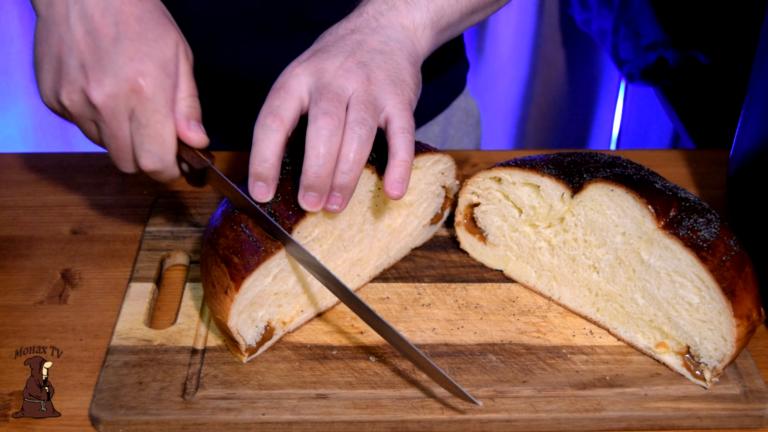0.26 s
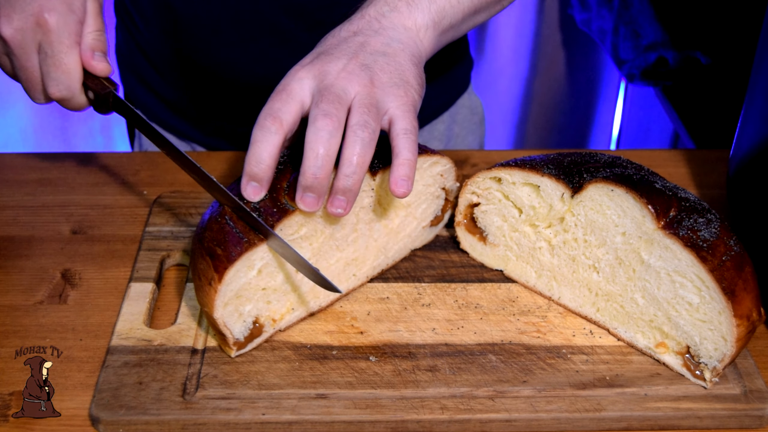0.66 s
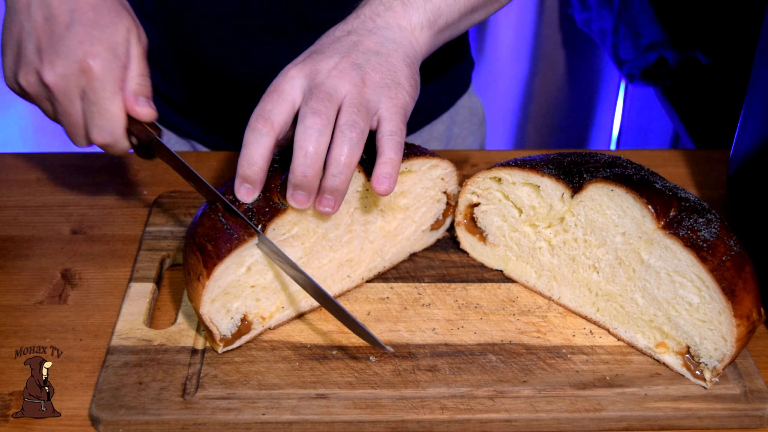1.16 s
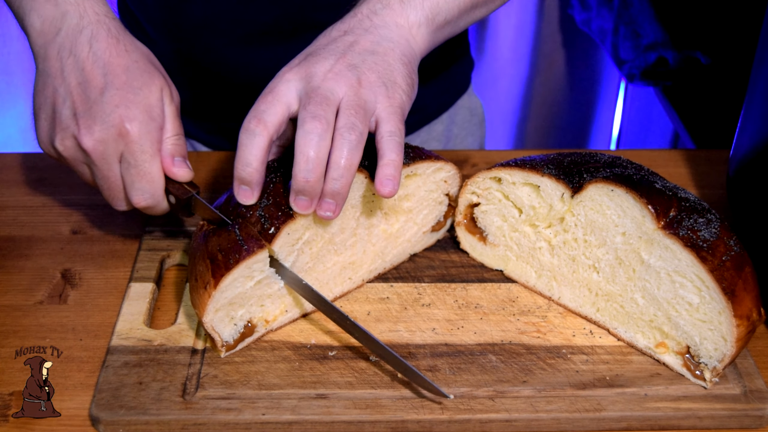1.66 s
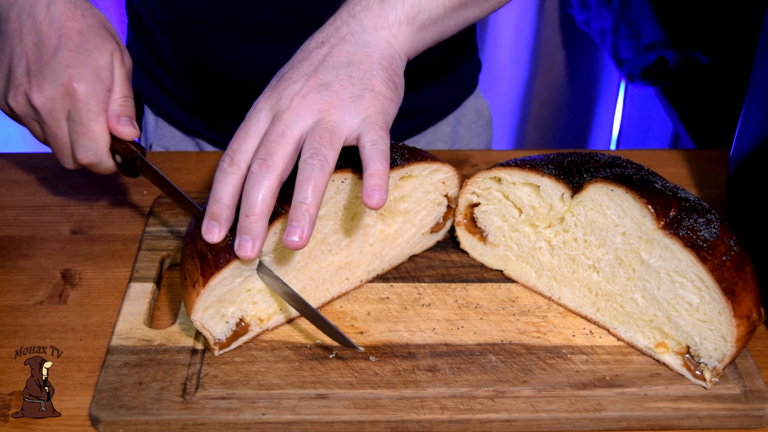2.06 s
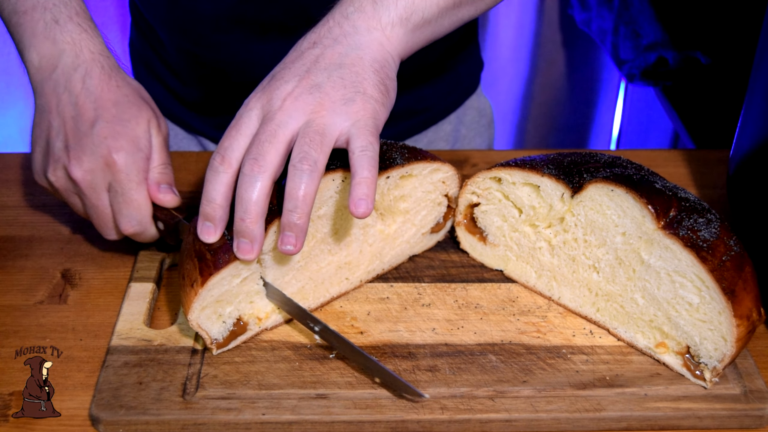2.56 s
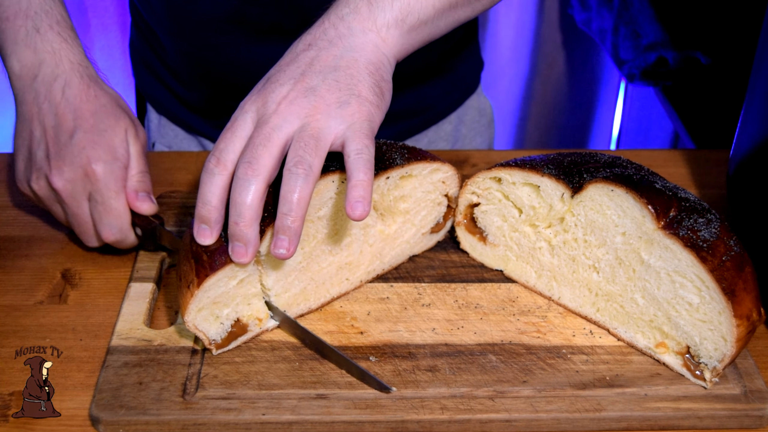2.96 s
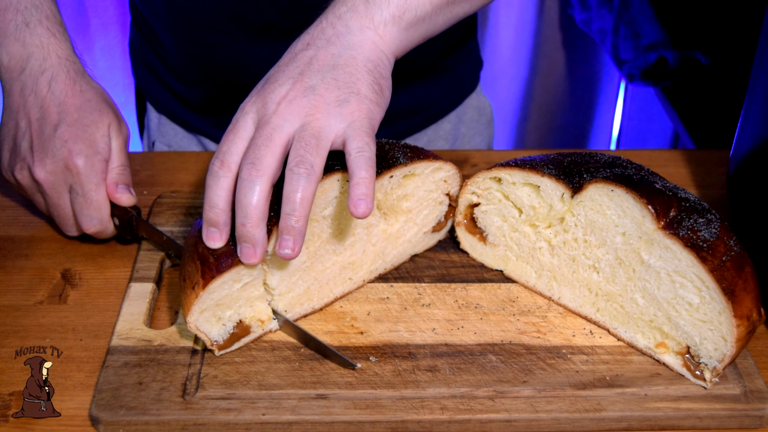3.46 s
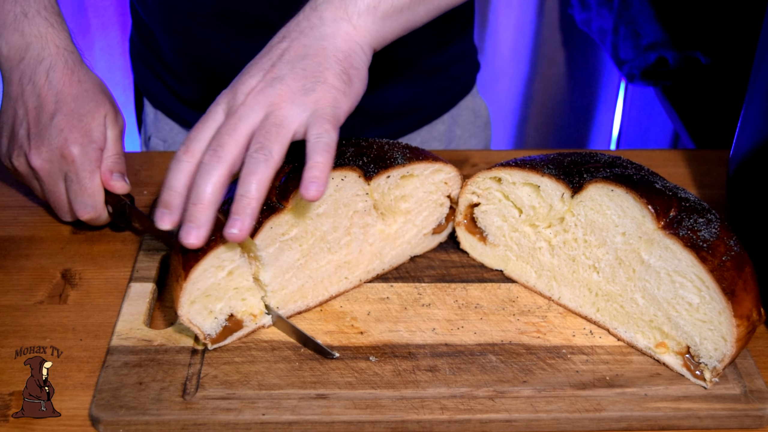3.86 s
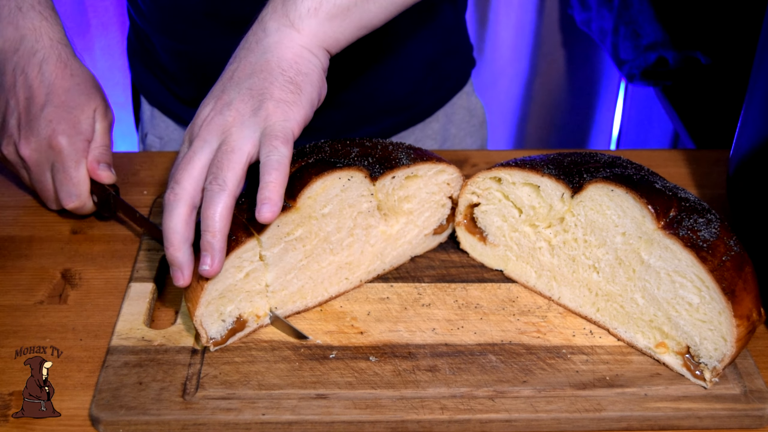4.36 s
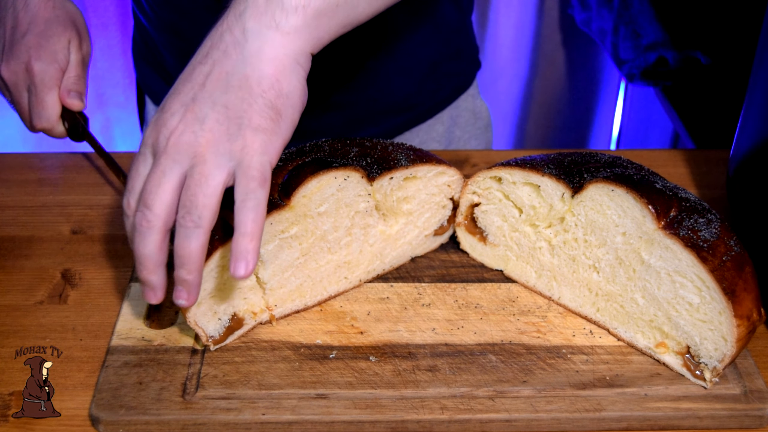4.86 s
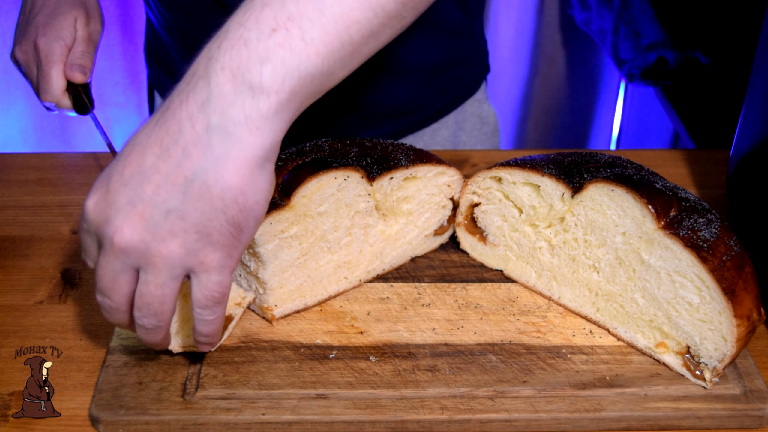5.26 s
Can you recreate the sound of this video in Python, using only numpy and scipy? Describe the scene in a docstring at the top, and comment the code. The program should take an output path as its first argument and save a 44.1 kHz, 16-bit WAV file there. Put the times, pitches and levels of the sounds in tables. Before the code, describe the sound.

Close, rasping knife strokes cut through bread, the crust crackling before the blade drags out across a wooden board.

```python
"""A long knife saws through a soft loaf on a wooden board, close by in a quiet kitchen.
Tearing crumb hisses along the blade, and the crust gives way in small jerks that ring loaf and board.
The blade is then drawn out over the wood and a hand lifts the slice. Each friction is a stream of tiny
stick-slip kicks ringing a body. Distant rumble, a low hum and microphone hiss lie underneath."""
import sys
import numpy as np
from scipy import signal
from scipy.fft import rfft, irfft, next_fast_len
from scipy.io import wavfile
from scipy.ndimage import uniform_filter1d, map_coordinates

SR = 44100
rng = np.random.default_rng(int(sys.argv[2]) if len(sys.argv) > 2 else 0)


def unload_audio(sound):
    """Save the sound as a 16-bit wav file, at the path given as the first command line argument."""
    columns = np.transpose(np.atleast_2d(sound))
    # keep every value between -1 and 1, then stretch to whole-number steps
    steps = np.round(np.clip(columns, -1, 1) * 32767)
    wavfile.write(sys.argv[1], SR, steps.astype(np.int16))


N = 243431


def amp(db):
    """Gain of a level in dB."""
    return 10 ** (np.asarray(db) / 20)


def unit(x):
    """x at rms 1."""
    return x / np.sqrt(np.mean(x ** 2) + 1e-20)


def fader(level_db, sound):
    """A sound brought to rms 1, then ridden by a level curve."""
    return amp(level_db) * unit(sound)


def along(points, hz):
    """Read (freq_hz, value) points at hz, on a log frequency axis."""
    freqs, values = np.transpose(points)
    return np.interp(np.log(hz + 1), np.log(freqs + 1), values)


def curves(rows):
    """Automation: one value per sample for each column after the time."""
    times, *columns = np.transpose(rows)
    return [np.interp(np.arange(N) / SR, times, column) for column in columns]


def wobble(rate_hz):
    """A smooth random curve with rate_hz knots a second."""
    knots = rng.standard_normal(int(N * rate_hz / SR) + 4)
    return map_coordinates(knots, [np.arange(N) * rate_hz / SR])


def filtered(x, response):
    """x through a complex frequency response."""
    size = next_fast_len(N + SR // 2)
    return irfft(rfft(x, size) * response(np.fft.rfftfreq(size, 1 / SR)), size)[..., :N]


def ring(x, modes):
    """x rings a body: one band-pass resonance per mode, alternating in polarity."""
    return filtered(x, lambda hz: sum(
        (-1) ** k * amp(db) * 1j * hz * width / (pitch ** 2 - hz ** 2 + 1j * hz * width)
        for k, (pitch, width, db) in enumerate(modes)))


def slips(per_s, spread_db, clump_db):
    """Tiny stick-slip kicks at random moments: many small, few large, clumped by a wavering level."""
    happens = rng.random(N) < per_s / SR
    size_db = spread_db * np.minimum(rng.exponential(size=N), 3.5) + clump_db * wobble(45)
    return happens * rng.choice([-1, 1], N) * amp(size_db)


def patchy(x, depth_db):
    """The contact shifts along the blade, so the colour drifts in patches."""
    spectrum = signal.stft(x, nperseg=512)[2]
    patches = uniform_filter1d(rng.standard_normal(spectrum.shape), size=5, axis=0)  # across frequency
    patches = uniform_filter1d(patches, size=10, axis=1)  # across time
    return signal.istft(spectrum * amp(depth_db * unit(patches)), nperseg=512)[1][:N]


# Tone of the rumble: freq_hz, gain_db
RUMBLE_EQ = [(15, -47), (25, -17), (64, -5.5), (130, -10), (205, -12.5), (400, -16.5), (1000, -21.5),
             (3000, -29), (8000, -31), (16000, -44)]


def distant_rumble():
    """A bed of far rumble through the walls, its level wavering slightly."""
    rumble = filtered(rng.standard_normal(N), lambda hz: amp(along(RUMBLE_EQ, hz)))
    return amp(-53.5 + 0.52 * wobble(3.12)) * unit(rumble)


# Path of the hum: time_s, pitch_hz, level_db
HUM_PATH = [(0.0, 99.0, -62), (0.11, 96.1, -71), (0.23, 132, -53), (0.58, 128, -59), (0.75, 85.8, -60.5),
            (1.78, 88.4, -61), (2.03, 139, -79), (2.31, 120, -60), (2.46, 137, -61), (3.15, 111, -59),
            (3.2, 124.3, -57), (3.5, 127, -51), (3.86, 135, -67.5), (4.09, 100.5, -81), (4.21, 96.7, -61),
            (4.32, 136, -60.5), (4.55, 122, -66.5), (4.89, 139.4, -65), (5.04, 117.3, -73),
            (5.52, 132, -60)]


def low_hum():
    """A low, wavering tone that comes and goes."""
    pitch_hz, level_db = curves(HUM_PATH)
    peak = np.sqrt(2) * amp(level_db + 1.9 * wobble(23))
    cycles = np.cumsum(pitch_hz + 1.36 * wobble(5.6)) / SR
    return peak * np.sin(2 * np.pi * cycles)


# Decay of the room: freq_hz, t60_s
KITCHEN_DECAY = [(200, 0.18), (2000, 0.1), (12000, 0.05)]


def kitchen_reverb(x):
    """A short room tail whose highs die first."""
    hz, t, noise = signal.stft(rng.standard_normal(SR // 2), SR, nperseg=256)
    decay = amp(-60 * t / along(KITCHEN_DECAY, hz)[:, None])
    tail = signal.istft(noise * decay, SR, nperseg=256)[1]
    predelayed = np.pad(x, (200, 0))
    return signal.fftconvolve(predelayed, tail / np.linalg.norm(tail))[:N]


# Resonances of loose crumb, loaf and blade flank, shared with the knife: pitch_hz, width_hz, gain_db
DUST_MODES = [(4730, 650, -2), (5900, 1400, 0), (8600, 2700, -1), (10500, 1300, 1), (12700, 1900, -2.5)]
LOAF_MODES = [(599, 75, 4), (835, 103, 5.5), (1143, 164, 0), (1428, 96, -1), (1612, 85, -2.5),
              (2140, 250, -9.5)]
BLADE_MODES = [(1920, 245, 1), (2374, 126, 2.5), (2810, 740, -1.5), (4610, 660, -5.5)]
# Fingers lifting the slice: time_s, crumb_db, rub_db
LIFT_LEVELS = [(5.05, -66, -62.5), (5.122, -68, -57), (5.154, -51, -54), (5.218, -46, -56),
               (5.288, -66, -58.5), (5.316, -51, -59), (5.33, -68, -64), (5.4, -69, -61)]


def slice_lift():
    """Skin rustles on crumb and crust."""
    crumb_db, rub_db = curves([(5.02, -79, -97)] + LIFT_LEVELS + [(5.44, -88, -90)])
    touch = slips(8000, spread_db=4.5, clump_db=0.0)
    return (fader(crumb_db, ring(touch, DUST_MODES[2:]))
            + fader(rub_db, ring(touch, LOAF_MODES[2:] + BLADE_MODES)))


# Resonances of rubbed wood, sliding blade and table: pitch_hz, width_hz, gain_db
WOOD_MODES = [(463, 235, -2.5), (930, 260, -1.5), (1320, 280, -1.5), (1680, 190, -2)]
SLIDE_MODES = [(1920, 54, 3), (2110, 170, -3.5), (2650, 280, -1), (3250, 260, -3), (3800, 780, -8.5)]
TABLE_MODES = [(135, 32, -0.5), (203.2, 37, 5.5), (286, 92, -4.5)]
# The blade sliding out: time_s, crumb_db, wood_db, blade_db, push_db
DRAW_LEVELS = [(4.02, -53, -59, -63, -76), (4.044, -65, -73, -69, -58), (4.118, -47, -51, -58, -64),
               (4.142, -59, -59, -68, -72), (4.26, -48, -42, -47.5, -49), (4.344, -49, -47, -45.5, -72),
               (4.458, -43, -41, -40, -63), (4.486, -41.5, -45, -41, -84), (4.516, -44.5, -42, -40, -74),
               (4.616, -40, -44.5, -40, -54), (4.652, -41, -48, -46.5, -77), (4.668, -43, -45, -47, -77),
               (4.796, -48, -45, -46.5, -67), (4.814, -51, -46, -47, -41.5),
               (4.866, -50.5, -42, -47, -42.5), (4.93, -60, -69, -70, -64), (5.0, -63, -70, -76, -70)]


def blade_draw():
    """The edge drags over the board's grain; a last push makes the table groan."""
    rows = [(3.98, -92, -78, -83, -82)] + DRAW_LEVELS + [(5.04, -88, -90, -90, -90)]
    crumb_db, wood_db, blade_db, push_db = curves(rows)
    grain = slips(4000, spread_db=3.1, clump_db=0.9)
    dust = slips(9000, spread_db=1.0, clump_db=1.1)
    return (fader(crumb_db, ring(dust, DUST_MODES))
            + fader(wood_db, patchy(ring(grain, WOOD_MODES), depth_db=2.0))
            + fader(blade_db, patchy(ring(grain, SLIDE_MODES), depth_db=2.5))
            + fader(push_db, ring(grain, TABLE_MODES)))


# Bright resonances of breaking crumb, shared with the sawing: pitch_hz, width_hz, gain_db
CRUMB_MODES = [(5653, 1170, -2), (7060, 790, 2), (7720, 1060, 0), (9530, 1100, -0.5), (10420, 1020, -1),
               (12360, 1050, -1), (14560, 1640, -9)]
# Snap cues: start_s, peak_db
SNAP_CUES = [(1.5816, -24), (2.3341, -29), (2.4443, -20), (2.6663, -31), (2.9193, -32), (3.207, -26),
             (3.2331, -27), (4.0901, -36), (4.2048, -31.5), (4.321, -29), (5.1347, -44), (5.1552, -38),
             (5.212, -28)]


def crumb_snaps(burst_s=0.0011):
    """Dry crumbs snap: a burst of force swells, dies and rings as a bright tick."""
    out, t = np.zeros(N + SR), np.arange(SR // 20) / SR
    ping = ring(np.arange(N) == 0, CRUMB_MODES[2:])[:len(t)]
    for start_s, peak_db in SNAP_CUES:
        force = rng.standard_normal(len(t)) * t * np.exp(-t / burst_s)
        tick = np.convolve(force, ping)[:len(t)]
        out[round(start_s * SR):][:len(t)] += amp(peak_db) * tick / np.abs(tick).max()
    return out[:N]


# Single jerks of the crust: start_s, level_db, pitch_hz, crumble_decay_s, sharpness (0-1)
JERK_CUES = [(0.719, -41, 550, 0.013, 0.39), (1.766, -35, 1340, 0.011, 0.3), (1.901, -44, 899, 0.011, 0.4),
             (2.248, -31.5, 1092, 0.011, 0.5), (2.431, -23, 1130, 0.018, 0.1),
             (2.448, -19.5, 1140, 0.011, 0.4), (2.504, -20.5, 1090, 0.012, 0.25),
             (2.603, -31.5, 1590, 0.013, 0.23), (2.936, -35, 1160, 0.011, 0.3),
             (2.987, -23, 1140, 0.0094, 0.3), (2.998, -16.5, 1140, 0.011, 0.14),
             (3.002, -15.5, 1010, 0.011, 0.3), (3.007, -27, 1080, 0.0099, 0.1),
             (3.373, -25.5, 825, 0.012, 0.23), (3.456, -20.5, 822, 0.011, 0.26),
             (3.488, -28, 646, 0.011, 0.3), (3.619, -41, 1920, 0.011, 0.4), (3.879, -38, 634, 0.013, 0.3),
             (3.906, -40, 1170, 0.011, 0.5), (4.225, -35, 840, 0.011, 0.2),
             (4.682, -25.5, 1340, 0.011, 0.23), (4.72, -34, 1490, 0.011, 0.4),
             (4.743, -36, 1200, 0.011, 0.4), (4.805, -31.5, 930, 0.011, 0.5),
             (5.135, -29, 1110, 0.0097, 0.4), (5.202, -45, 1130, 0.012, 0.4),
             (5.211, -35, 1130, 0.012, 0.3)]


def crust_jerks():
    """The crust gives with a rounded knock of two or three cycles; smaller ones follow as it crumbles."""
    out, t = np.zeros(N + SR), np.arange(SR // 10) / SR
    knock_t = t[:400]
    for start_s, level_db, pitch_hz, crumble_decay_s, sharpness in JERK_CUES:
        cycles = pitch_hz * knock_t
        swell = cycles / 0.55  # the envelope peaks after about half a cycle
        tone = np.sin(2 * np.pi * cycles) + sharpness * np.sin(2 * np.pi * 2.25 * cycles)
        dry_edge = uniform_filter1d(rng.standard_normal(len(knock_t)), size=4) * np.exp(-knock_t / 0.0021)
        knock = swell * np.exp(1 - swell) * tone + 1.25 * sharpness * dry_edge
        crumbles = rng.random(len(t)) < 600 / SR
        kicks = crumbles * rng.uniform(-0.91, 1, len(t)) * 1.17 * np.exp(-t / crumble_decay_s)
        kicks[0] = 1  # the first break
        out[round(start_s * SR):][:len(t)] += amp(level_db) * np.convolve(kicks, knock)[:len(t)]
    return out[:N]


# Resonances of the board and the ringing steel: pitch_hz, width_hz, gain_db
BOARD_MODES = [(131.3, 33, -3), (201, 28.6, -8.5), (269, 19, -2.5), (343.6, 12.9, 1.5), (418, 33, -1.5),
               (493, 34, -1)]
STEEL_MODES = [(3500, 110, -1), (3950, 120, 0), (5730, 150, -5), (7890, 200, -4), (12250, 500, 0),
               (13000, 400, -2)]
# The cut, in four passages: time_s, crumb_db, crust_db, blade_db, board_db, steel_db, dullness (0-1)
SAW_PASSAGES = [
    [(0.0, -49, -51, -55, -66, -65, 0.6), (0.026, -49, -57.5, -55, -63, -57, 0.54),
     (0.184, -38.5, -50, -52, -64, -53, 0.36), (0.226, -39, -52.5, -49, -49.5, -48, 0.5),
     (0.254, -38.5, -49, -50.5, -63, -56, 0.45), (0.322, -36, -47, -48.5, -53, -55, 0.43),
     (0.438, -64, -61, -63, -63, -79, 0.54), (0.464, -40, -52, -51, -53, -58, 0.37),
     (0.508, -35.5, -45, -46.5, -47.5, -57, 0.5), (0.65, -39, -49.5, -54, -57, -53, 0.42),
     (0.74, -52, -46, -51.5, -50, -65, 0.4), (0.788, -70, -56, -67, -62, -74, 0.6),
     (0.852, -45, -48, -54, -51, -70, 0.4), (0.91, -43, -49.5, -54.5, -56, -64, 0.43),
     (1.004, -32.5, -42, -45.5, -52, -53, 0.35), (1.026, -37, -45, -44.5, -50.5, -51, 0.45),
     (1.116, -61, -63, -65, -67, -75, 0.7), (1.136, -44, -49, -53, -51, -70, 0.6),
     (1.18, -40.5, -43, -47.5, -51.5, -58, 0.5), (1.27, -38, -45.5, -47, -55.5, -57, 0.38),
     (1.348, -42, -49, -51, -50, -61, 0.5), (1.376, -48.5, -57, -53, -59, -60, 0.27),
     (1.438, -63, -62, -67, -62, -73, 0.2), (1.466, -56, -53.5, -58, -74, -71, 0.5),
     (1.512, -42, -46, -52, -50, -68, 0.43), (1.544, -38, -40.5, -44.5, -51, -55, 0.5),
     (1.624, -34.5, -38, -43, -46.5, -63, 0.44), (1.692, -46, -47, -49, -47, -67, 0.43),
     (1.84, -65, -76, -81, -75, -77, 0.35), (1.9, -59, -68, -69, -61, -74, 0.4)],
    [(1.9, -66, -66, -67, -70, -74, 0.4), (1.972, -55, -57, -59, -70, -71, 0.35),
     (2.036, -47.5, -47, -50, -47.5, -65, 0.41), (2.164, -51.5, -54, -55, -66, -67, 0.46),
     (2.202, -52, -57, -61, -58, -69, 0.53), (2.262, -69, -60, -51, -53, -65, 0.2),
     (2.298, -50, -53, -67, -62, -73, 0.33), (2.354, -35, -46, -46, -53.5, -42, 0.34),
     (2.434, -37.5, -38.5, -44, -44, -39, 0.43), (2.452, -29.5, -37, -34.5, -41, -28, 0.7),
     (2.48, -39.5, -33, -48, -41, -34, 0.15), (2.536, -38, -37, -43, -35, -38.5, 0.05),
     (2.578, -54, -48.5, -56, -62, -59, 0.63), (2.642, -45.5, -47.5, -54.5, -55, -45, 0.34),
     (2.744, -46, -44, -52, -49.5, -60, 0.49), (2.838, -54.5, -59, -58, -60, -70, 0.4),
     (2.86, -53, -67, -72, -76, -77, 0.44)],
    [(2.86, -65, -59, -69, -74, -77, 0.46), (2.94, -37.5, -34.5, -40, -43.5, -44, 0.36),
     (3.012, -41, -32.5, -42.5, -35, -47, 0.28), (3.048, -38, -34.5, -41, -50, -42, 0.42),
     (3.078, -49.5, -42.5, -50, -43.5, -53, 0.55), (3.13, -58, -52.5, -58, -61, -64, 0.44),
     (3.198, -44.5, -38.5, -44.5, -54, -48, 0.26), (3.278, -39, -37, -42.5, -44, -53, 0.45),
     (3.366, -51.5, -39.5, -54, -47.5, -59, 0.33), (3.416, -58, -49, -63, -47, -76, 0.5),
     (3.43, -60, -54, -58, -58, -68, 0.3)],
    [(3.43, -59, -47, -57, -52, -66, 0.3), (3.478, -43.5, -30.5, -45, -35.5, -58, 0.53),
     (3.524, -49, -39.5, -49, -44, -62, 0.5), (3.578, -64, -57, -70, -73, -79, 0.6),
     (3.622, -47, -40, -43, -45, -63, 0.43), (3.71, -47.5, -42.5, -52, -48.5, -55, 0.29),
     (3.75, -49.5, -37, -47, -53, -67, 0.44), (3.784, -59, -54, -55, -48.5, -67, 0.5),
     (3.828, -62, -58.5, -70, -67, -77, 0.3), (3.904, -56, -45.5, -52.5, -54.5, -65, 0.38),
     (4.0, -56, -59.5, -72, -61, -74, 0.44)],
]


def sawing():
    """The knife tears the crumb, catches on the crust, shakes the board, scrapes and rings."""
    rows = sum(SAW_PASSAGES, []) + [(4.04, -90, -90, -88, -90, -88, 0.024)]
    crumb_db, crust_db, blade_db, board_db, steel_db, dullness = curves(rows)
    catches = slips(900, spread_db=1.5, clump_db=1.14)
    scrape = slips(5000, spread_db=0.5, clump_db=0.6)
    tearing = slips(16000, spread_db=2.5, clump_db=0.28)
    softened = filtered(catches, lambda hz: 1 / (1 + 1j * hz / 2500) ** 2)  # the contact yields
    loaf_low = unit(ring(softened, LOAF_MODES[:2]))
    loaf_high = unit(ring(softened, LOAF_MODES[2:]))
    crust = dullness * loaf_low + (1 - dullness) * loaf_high
    return (fader(crumb_db, patchy(ring(tearing, CRUMB_MODES), depth_db=1.2))
            + fader(crust_db, patchy(crust, depth_db=1.0))
            + fader(board_db, ring(catches, BOARD_MODES))
            + fader(blade_db, patchy(ring(scrape, BLADE_MODES), depth_db=1.0))
            + fader(steel_db, patchy(ring(scrape, STEEL_MODES), depth_db=2.4)))


def scene():
    """The cut, a touch of room and the background reach both close-set microphones alike."""
    cut = sawing() + blade_draw() + slice_lift() + crust_jerks() + crumb_snaps()
    mix = cut + amp(-10.5) * kitchen_reverb(cut) + low_hum() + distant_rumble()
    return np.tile(mix, (2, 1))


# Tone of the microphone hiss: freq_hz, gain_db
HISS_EQ = [(30, 3), (300, 3), (800, 0.5), (6000, 0), (16000, -1)]


def record(dry):
    """Each channel has its own hiss and both share one more; a high cut tops off the mix."""
    own_db, shared_db, high_cut_hz = -54.7, -54.2, 15900
    hiss = filtered(rng.standard_normal((3, N)), lambda hz: amp(along(HISS_EQ, hz)))
    noisy = dry + fader(own_db, hiss[:2]) + fader(shared_db, hiss[2])
    return filtered(noisy, lambda hz: hz < high_cut_hz)


dry = scene()
out = record(dry)
unload_audio(out)
```